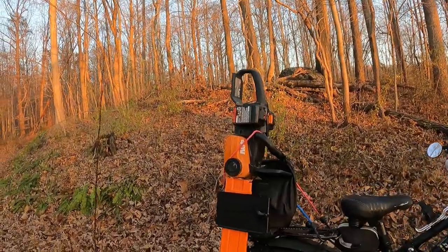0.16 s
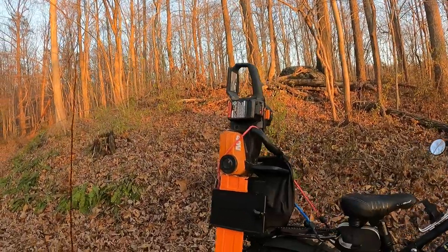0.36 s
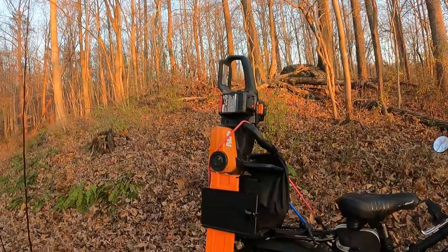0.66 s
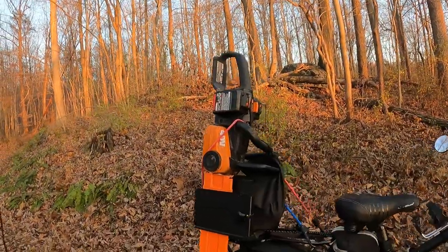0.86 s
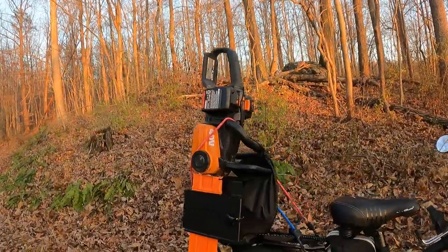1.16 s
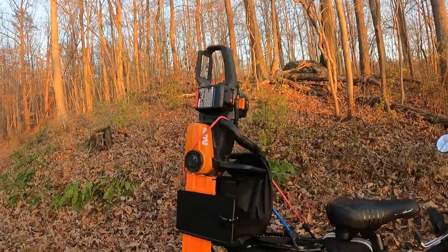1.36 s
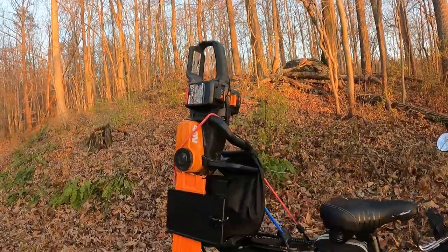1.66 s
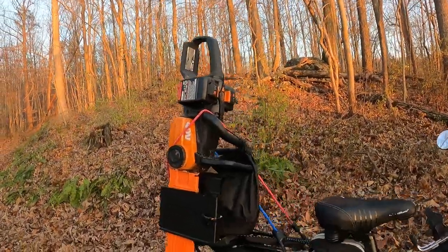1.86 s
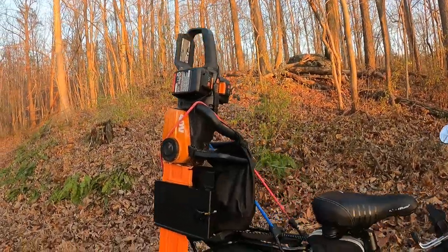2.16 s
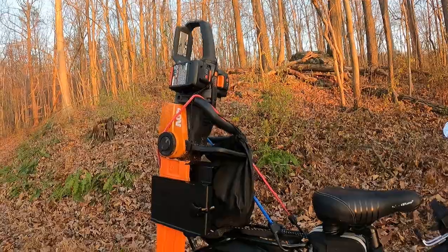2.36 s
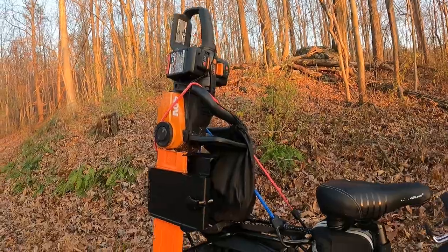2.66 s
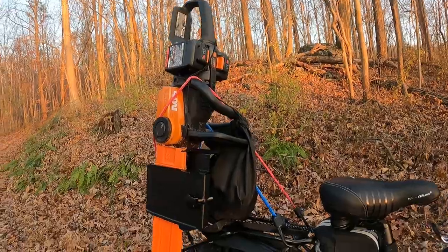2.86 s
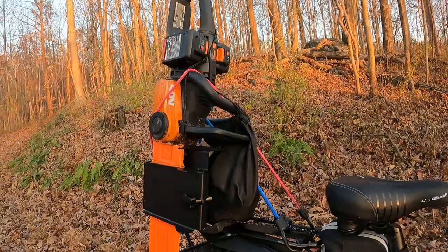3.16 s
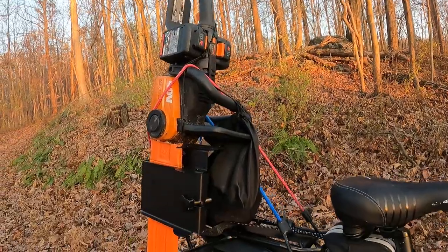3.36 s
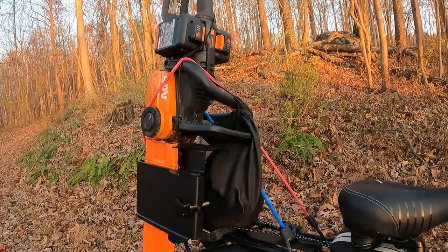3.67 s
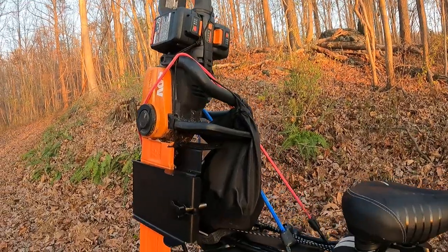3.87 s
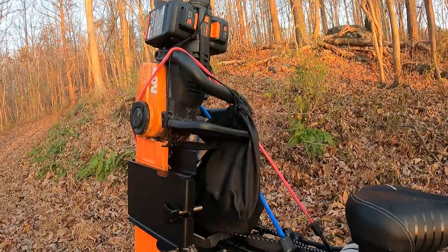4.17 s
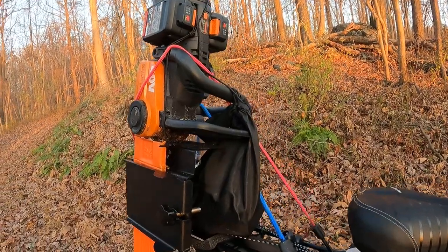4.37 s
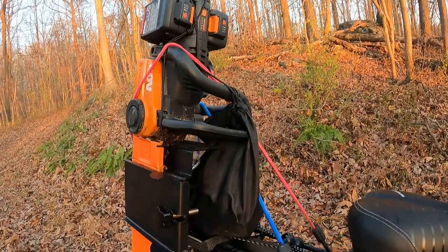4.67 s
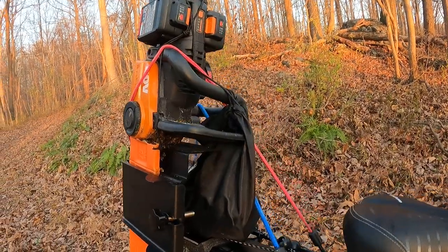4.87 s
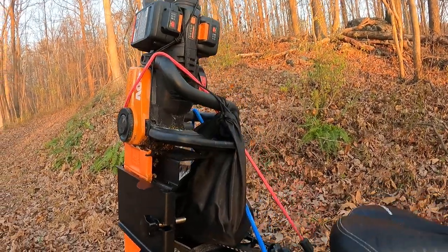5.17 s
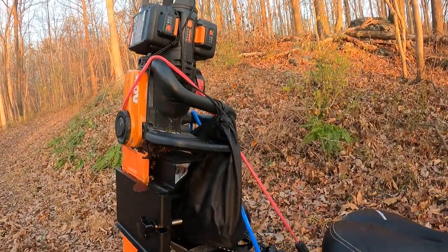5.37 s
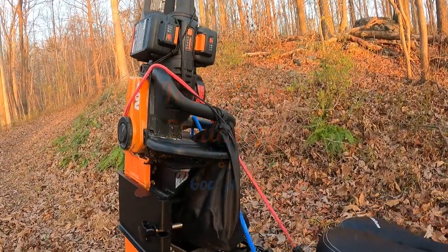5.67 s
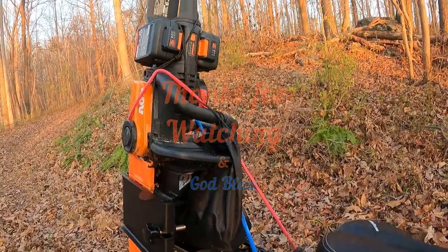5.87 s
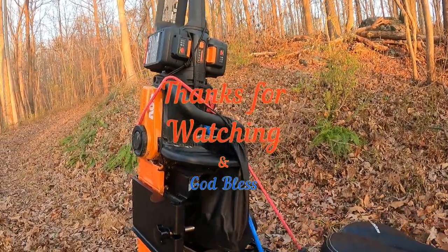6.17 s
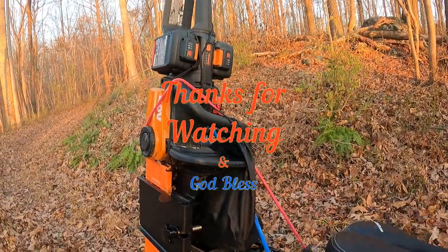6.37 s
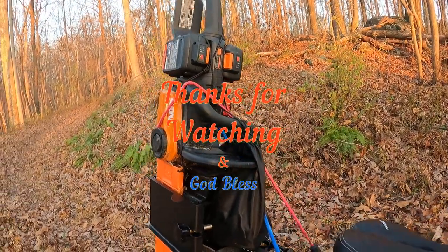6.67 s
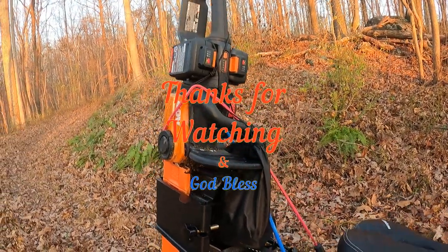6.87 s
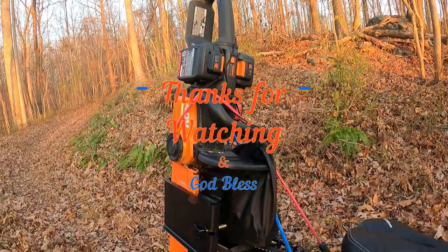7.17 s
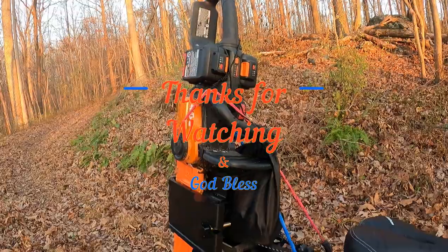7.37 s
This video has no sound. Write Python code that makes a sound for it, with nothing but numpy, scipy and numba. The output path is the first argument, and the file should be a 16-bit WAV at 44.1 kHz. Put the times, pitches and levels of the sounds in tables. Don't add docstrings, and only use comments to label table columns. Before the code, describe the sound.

Feet drag slowly through deep dry leaves, crackling and crunching in uneven swells with sharp twig snaps, mostly to the left, over faint wind.

```python
import sys
import numpy as np
from scipy import signal
from scipy.fft import rfft, irfft, next_fast_len
from scipy.io import wavfile
from scipy.ndimage import map_coordinates
from numba import njit

SR = 44100
rng = np.random.default_rng(int(sys.argv[2]) if len(sys.argv) > 2 else 0)


def boost(x):
    u = np.asarray(x, float) / 20
    return 10 ** u


def unload_wav(signal):
    wavfile.write(
        sys.argv[1],
        SR,
        np.round(np.clip(np.atleast_2d(signal).T, -1, 1) * 32767).astype(np.int16),
    )


N = 332073


def unit(x):
    return x / np.sqrt(np.mean(x ** 2) + 1e-20)


def along(points, hz):
    f, v = np.transpose(points)
    return np.interp(np.log(hz + 1), np.log(f + 1), v)


def curves(rows):
    s, *cols = np.transpose(rows)
    return [np.interp(np.arange(N) / SR, s, c) for c in cols]


def wobble(rate):
    knots = rng.standard_normal(int(N * rate / SR) + 4)
    return map_coordinates(knots, [np.arange(N) * rate / SR])


def filtered(x, response):
    m = next_fast_len(N + SR // 2)
    return irfft(rfft(x, m) * response(np.fft.rfftfreq(m, 1 / SR)), m)[..., :N]


def causal(points):
    def response(hz):
        cep = irfft(np.log(boost(along(points, hz)) + 1e-6))
        cep[1:len(cep) // 2] *= 2
        cep[len(cep) // 2 + 1:] = 0
        return np.exp(rfft(cep))
    return response


def air(spectrum):
    return unit(filtered(rng.standard_normal((2, N)), lambda hz: boost(along(spectrum, hz))))


def ports(pair, alike, left_db, lead):
    def response(hz):
        turn = np.arccos(np.clip(along(alike, hz), -1, 1)) / 2
        side = boost(along(left_db, hz) / 2) * np.exp(.5j * along(lead, hz))
        left = [side * np.cos(turn), side * np.sin(turn)]
        right = [np.cos(turn) / side, -np.sin(turn) / side]
        return np.array([left, right])
    return filtered(pair, response).sum(axis=1)


# frequency in Hz, level in dB per Hz.
FOREST = [(88, -35), (150, 6), (811, -3.5), (975, -13), (1430, -6.5), (3300, -13.5), (5180, -33),
          (8140, -59), (10600, -89), (17900, -120)]


def hush():
    return boost(-58) * air(FOREST)


# time in seconds, sway level in dB, rumble level in dB.
WIND = [(0.0, -52.5, -39), (0.06, -38.5, -48), (0.12, -41, -54), (0.61, -31.5, -55.5), (0.67, -52, -43),
        (0.82, -35.5, -56), (1.03, -42, -53.5), (3.23, -44, -46.5), (3.75, -50, -57.5),
        (4.59, -47.5, -49.5), (5.41, -42, -55), (5.85, -50.5, -48), (5.89, -37.5, -51.5),
        (6.61, -49.5, -47.5), (6.98, -31, -48.5), (7.23, -44, -48.5), (7.26, -42, -44.5),
        (7.53, -32.5, -51)]
# frequency in Hz, level in dB per Hz.
SWAY = [(2, -30.5), (5, 13.5), (14, 8.5), (32, -3), (48, -20), (90, -67)]
# frequency in Hz, level in dB per Hz.
RUMBLE = [(12, -18), (24, -10), (34, -2.5), (46, -6.5), (57, 0.5), (70, -9), (160, -17), (400, -28.5),
          (900, -58.5)]
# frequency in Hz, level in dB per Hz.
MOAN = [(90, -27), (130, -5.5), (220, 1), (280, -10), (380, -45)]


def wind():
    sway_db, rumble_db = curves(WIND)
    sway = boost(sway_db) * ports(air(SWAY), [(10, 0.75)], [(6, 14), (22, 1.1)], [(10, 0.0037)])
    gusts_db = 1.5 * wobble(5)
    rumble = boost(rumble_db + gusts_db) * ports(air(RUMBLE), [(50, .92)], [(50, .6)], [(10, 0.012)])
    moan_s, swell_s = 6.64, .2
    swell = np.exp(-((np.arange(N) / SR - moan_s) / swell_s) ** 2)
    moan = boost(-46) * swell * ports(air(MOAN), [(50, 0.73)], [(50, 3)], [(10, 0)])
    return sway + rumble + moan


# peak time in seconds, peak level in dB,
# seconds to swell by 10 dB, seconds to fade by 10 dB.
PUSHES = [(0.12, -36, 0.85, 0.37), (0.47, -26, 0.13, 0.3956), (0.65, -26, 0.34, 0.0767),
          (0.87, -32.5, 0.14, 0.11), (1.15, -40, .15, 1.5), (1.78, -33, -0.0055, 0.17),
          (2.08, -31.5, 0.05, 0.14), (2.3, -28.5, 0.33, 0.44), (2.58, -29, 0.3856, 0.27),
          (2.81, -26.5, 0.33, 0.31), (3.15, -22.5, .5, 0.0374), (3.275, -26.5, 0.14, 0.07),
          (3.42, -31, 0.17, 0.2248), (3.62, -28.5, 0.38, .1), (3.85, -38, 0.14, 0.27),
          (3.99, -38, -0.03, 0.09), (4.11, -29.5, 0.07, 0.37), (4.28, -31, 0.29, 0.0956),
          (4.49, -29.5, 0.05, 0.32), (4.7, -22.5, 0.1754, 0.07), (4.92, -32.5, 0.2, 0.19),
          (5.24, -37, 0.22, 0.18), (5.57, -42, 0.09, 0.48), (5.82, -33.5, 0.09, .3),
          (5.92, -29.5, 0.09, 0.3367), (6.12, -26.5, 0.21, 0.1), (6.4, -33.5, .5, 0.14),
          (6.87, -43, .3, 0.24), (7.04, -45, 0.19, 0.16), (7.36, -49, 0.22, 0.25)]


def drag():
    t = np.arange(N) / SR
    rest_db, after_db, after_t60_s = -54, -20, .08
    power = boost(2 * rest_db)
    for s, db, swell, fade in PUSHES:
        away = np.maximum((s - t) / abs(swell), (t - s) / abs(fade))
        power = power + boost(2 * (db - 10 * away))
    kicks = np.zeros(N)
    for s, db, *_ in [*SNAPS, *TICKS]:
        kicks[int(s * SR)] += boost(2 * (db + after_db))
    after = signal.lfilter([1], [1, -boost(-120 / (after_t60_s * SR))], kicks)
    return 10 * np.log10(power + after)


@njit
def rings(n, start, step, life, size, aside):
    out = np.zeros((2, n))
    for g in range(len(start)):
        first = int(np.ceil(start[g]))
        turn = np.exp(complex(-1 / life[g], step[g]))
        z = size[g] * np.exp(complex(-1 / life[g], step[g]) * (first - start[g]))
        for i in range(first, min(n, first + int(5 * life[g]))):
            out[0, i] += z.imag
            out[1, i] += (z * aside[g]).imag
            z *= turn
    return out


def bursts(s, db, hz, spread_s, cycles, uneven_db, fade_db, scatter):
    draw = rng.standard_normal((*hz.shape, 4))
    late = rng.exponential(size=hz.shape)
    late[:, 0] = 0
    hz = np.clip(hz, 60, 9000)
    start = (s[:, None] + spread_s * late) * SR
    life = cycles * np.exp(0.39 * draw[..., 0]) * SR / hz
    size = boost(db + uneven_db * draw[..., 1] - fade_db * late) * np.sign(draw[..., 2])
    aside = scatter * np.exp(3j * draw[..., 3])
    flat = [np.ravel(v) for v in (start, 2 * np.pi * hz / SR, life, size, aside)]
    return rings(N, *flat)


# frequency in Hz, level in dB per Hz.
LITTER = [(40, -24.5), (190, -11.5), (232, -6.5), (368, -10), (441, -3.5), (620, -2.5), (970, -5),
          (1570, -1), (3300, -1.5), (3900, -9), (5700, -20), (6200, -27), (7500, -35), (9600, -68.5)]
# time in seconds, weight in dB, dryness of the leaves in dB.
TREAD = [(0, 0, -2), (.3, -3, -0.5), (.62, 3, 2), (.95, -1, -1), (1.4, 1, 3.5), (1.8, -3, 4.5),
         (2.05, 2.5, 5), (2.55, -8, 0), (3.05, -0.5, 2.5), (3.6, 1, -2), (3.8, -1.5, -4), (4.2, 0, 1.5),
         (4.45, -1, 0.5), (5.1, 0.5, -0.5), (5.9, -2, -2.5), (6.15, -0.5, 1), (6.8, 6, 3), (7.2, 1, -2)]


def rustle(drag_db, count=22000, size=6):
    weight_db, crisp_db = curves(TREAD) + 0.5 * np.array([wobble(8), wobble(8)])
    weight_db = weight_db + 0.092 * (drag_db.mean() - drag_db)
    busy = boost(.9 * (drag_db - drag_db.mean()))
    busy /= busy.mean()
    draw = rng.random((count, 2 + size))
    at = np.interp(draw[:, 0], np.cumsum(busy) / N, np.arange(N)).astype(int)
    calm = np.clip(busy, .3, 4) ** -.3
    clump_db = calm * (2.17 * np.tanh(wobble(45)) + 1.5 * np.tanh(wobble(130)))
    big_db = np.minimum(-2.8 * np.log(1 - draw[:, 1]), 11)
    hz = 80 * 110 ** draw[:, 2:]
    even_db = 20 * np.log10(hz / 1000)
    db = (clump_db - 10 * np.log10(busy))[at, None] + big_db[:, None] + even_db
    breaks = bursts(at / SR, db, hz, spread_s=.0025, cycles=1.58, uneven_db=2.5, fade_db=4.5, scatter=0.97)
    wash = boost(-3.5 + 0.45 * clump_db) * air(LITTER)
    litter = unit(filtered(breaks, causal(LITTER))) + wash
    deep = filtered(litter, lambda hz: 1 / (1 + (hz / 800) ** 4))
    high = filtered(litter, lambda hz: 1 / (1 + (4200 / (hz + 1)) ** 6))
    middle = litter - deep - high
    return boost(drag_db - 0.05) * (middle + boost(weight_db) * deep + boost(crisp_db) * high)


# time in seconds, peak in dB, pitch in Hz,
# splinter share in dB.
SNAPS = [(0.02, -12.5, 1540, -53), (0.174, -15.5, 1500, -10), (0.508, -10, 1840, -24),
         (0.725, -11, 2060, -18.5), (0.764, -16.5, 1575, -20), (1.006, -14, 2860, -12),
         (1.095, -16.5, 1820, -17.5), (1.254, -17.5, 2600, -21.5), (1.755, -17.5, 3230, -12),
         (2.122, -14, 2530, -30), (2.404, -15, 3200, -17.5), (2.736, -15, 3290, -26.5),
         (3.171, -10, 2480, -25.5), (3.295, -12, 1610, -31), (3.511, -15, 3120, -23),
         (3.613, -14, 2280, -24), (3.854, -15, 2020, -30), (4.006, -14.5, 2990, -25.5),
         (4.095, -13, 2640, -24.5), (4.281, -14, 2210, -32.5), (4.471, -12.5, 1740, -18),
         (4.608, -10, 2250, -29.5), (4.713, -8, 1445, -21), (5.538, -19.5, 2530, -27),
         (5.572, -15.5, 2740, -43), (5.927, -13, 3080, -37), (6.137, -13, 2540, -32.5),
         (6.319, -17, 2800, -33), (6.41, -19.5, 1367, -27), (7.444, -18, 1980, -32)]
# time in seconds, peak in dB, pitch in Hz, #
# splinter share in dB.
TICKS = [(1.365, -24, 640, -21), (1.467, -21, 2300, -22), (1.53, -18, 1810, -19.5), (1.56, -21, 3400, -21),
         (1.615, -22.5, 3320, -15), (3.644, -15, 2160, -26), (3.735, -18, 2640, -24),
         (3.777, -21, 2220, -22.5), (3.814, -20, 823, -27), (3.889, -21, 648, -26),
         (3.943, -15.5, 2250, -26), (4.032, -22, 2400, -23), (4.078, -15, 2080, -23),
         (4.919, -18, 1876, -19), (5.104, -21, 1074, -25), (5.271, -20, 2750, -25), (5.364, -26, 1720, -29),
         (5.436, -22.5, 2330, -25), (5.626, -21, 2770, -27), (6.261, -16, 3370, -24),
         (6.279, -14, 2960, -21), (6.368, -20, 3080, -19), (6.516, -20, 1990, -27), (6.705, -37, 635, -26),
         (6.861, -24, 3330, -17), (7.148, -32, 740, -25), (7.207, -24, 2840, -35.5),
         (7.282, -29, 3280, -25), (7.385, -32, 2350, -20), (7.492, -30, 1540, -33)]


def cracks(drag_db, count=45):
    draw = rng.standard_normal((count, 3))
    s = rng.random(count) * (N - 1) / SR
    db = drag_db[(s * SR).astype(int)]
    drowned_db = 0.21 * (db - drag_db.mean())
    db = db - drowned_db + 13.5 - 0.5 * np.tanh(draw[:, 0])
    strays = np.c_[s, db, 2300 * np.exp(.3 * draw[:, 1]), -27 + 4 * draw[:, 2]]
    return np.vstack([SNAPS, TICKS, strays]).T


def snaps(drag_db, size=7):
    s, db, hz, high_db = cracks(drag_db)
    db = db + 3
    draw = rng.standard_normal((len(s), 3, size))
    draw[:, 0, 0] = 0
    after_db = -7 * (np.arange(size) > 0)
    alike = dict(spread_s=.0022, uneven_db=.8, fade_db=3, scatter=.4)
    body_hz = hz[:, None] * np.exp(0.21 * draw[:, 0])
    knock_hz = 600 * np.exp(0.32 * draw[:, 1])
    splinter_hz = 5000 * np.exp(.24 * draw[:, 2])
    click = bursts(s, db[:, None] + 1, 1.4 * hz[:, None], cycles=.35, **alike)
    body = bursts(s, db[:, None] + after_db + 1.5, body_hz, cycles=2.09, **alike)
    knock = bursts(s, db[:, None] - 20.0, knock_hz, cycles=1.3, **alike)
    splinters = bursts(s, (db + high_db)[:, None] + 13.5, splinter_hz, cycles=1.4, **alike)
    # (Hz, dB)
    muffle = [(60, -6.0), (300, -9), (4000, -3.5), (6000, -13), (7400, -23.5), (10000, -65)]
    return filtered(click + body + knock + splinters, causal(muffle))


# frequency in Hz, level in dB per Hz.
THUD = [(40, -29.5), (80, -1.5), (130, 0), (220, -5), (400, -41)]


def ground(drag_db):
    grows_db = 0.65 * (drag_db - drag_db.mean())
    return boost(-53.5 + grows_db + 1.9 * wobble(12)) * air(THUD)


# frequency in Hz, left-right likeness from 0 to 1.
ALIKE = [(60, 1), (300, 0.89), (900, 0.87), (2500, 0.8), (5000, 0.7), (7700, .85)]
# frequency in Hz, left over right in dB.
LEFT = [(60, 10), (100, -2.5), (180, 4), (300, 7), (520, 8.5), (890, 9), (1530, 8), (2620, 7), (4480, 13),
        (7690, 11)]
# frequency in Hz, radians by which the left leads.
LEAD = [(0, -1.5), (780, -0.35), (1380, -1.1), (1640, 1), (2500, 0.32), (3450, 1.06), (4130, 0.6),
        (5080, -0.2), (5510, -1.3), (5940, 3), (6630, 0.97), (7840, 2.2)]


def scene():
    drag_db = drag()
    trail = hush() + rustle(drag_db) + snaps(drag_db) + ground(drag_db)
    return ports(trail, ALIKE, LEFT, LEAD) + wind()


def band_limit(x):
    return signal.sosfilt(signal.butter(12, 8290, fs=SR, output="sos"), x)


# frequency in Hz, gain in dB.
EDGE = [(7200, -1), (7600, -2.5), (7800, -35), (8100, -36), (8600, -43.5)]


def record(dry):
    mix = filtered(dry, causal(EDGE))
    return band_limit(mix)


dry = scene()
out = record(dry)
unload_wav(out)
```